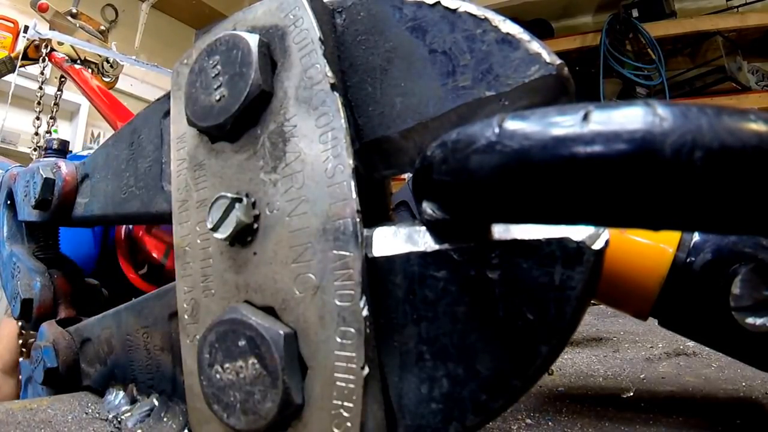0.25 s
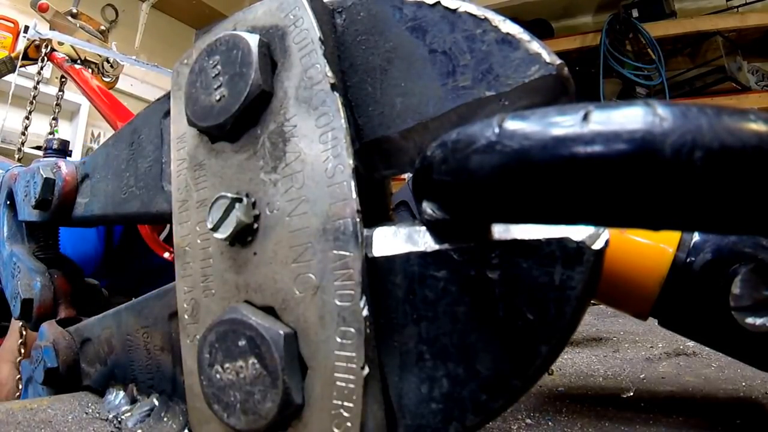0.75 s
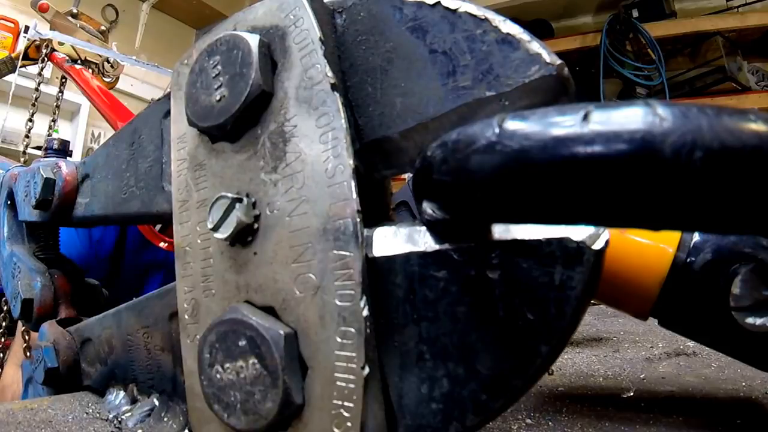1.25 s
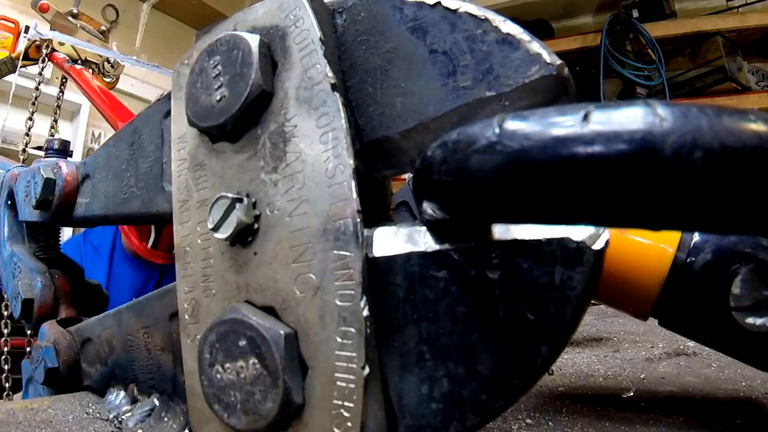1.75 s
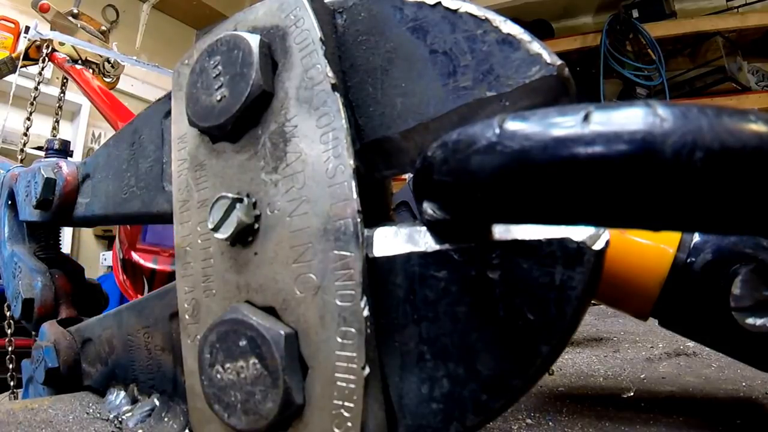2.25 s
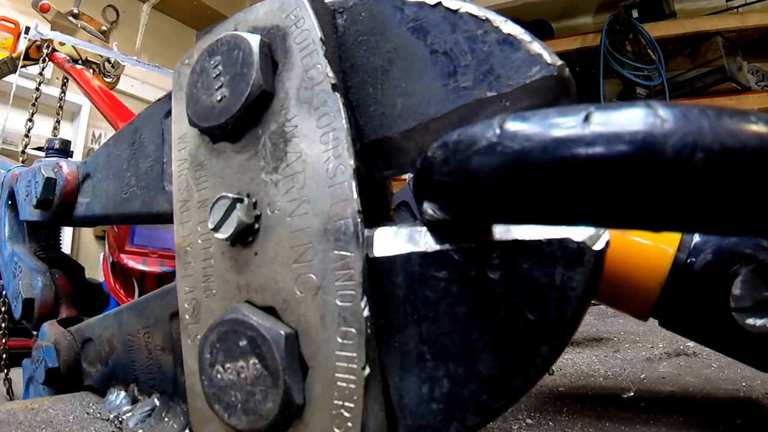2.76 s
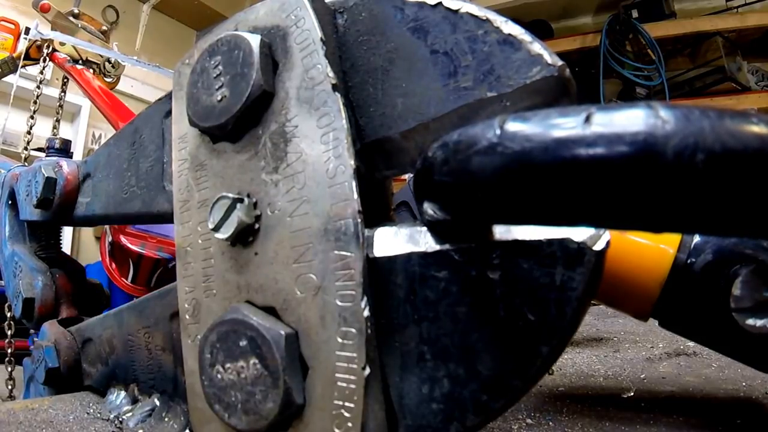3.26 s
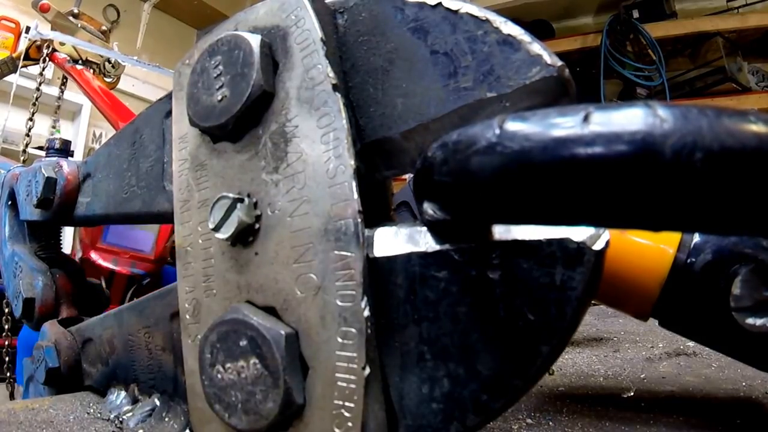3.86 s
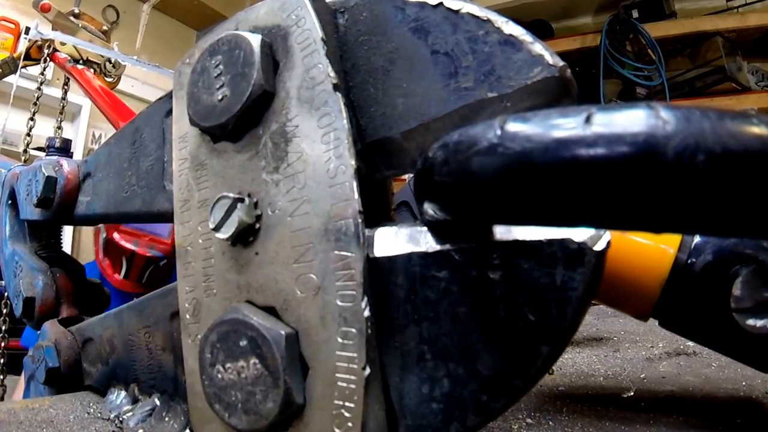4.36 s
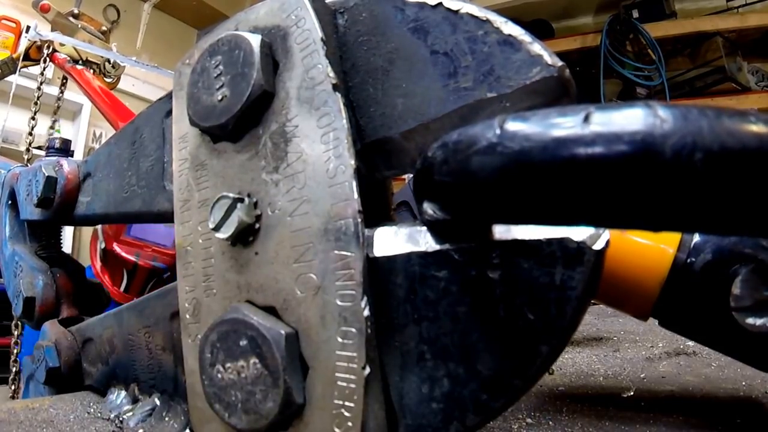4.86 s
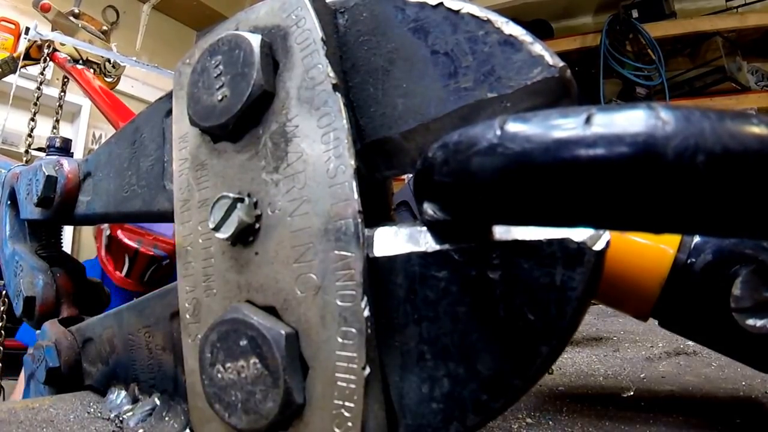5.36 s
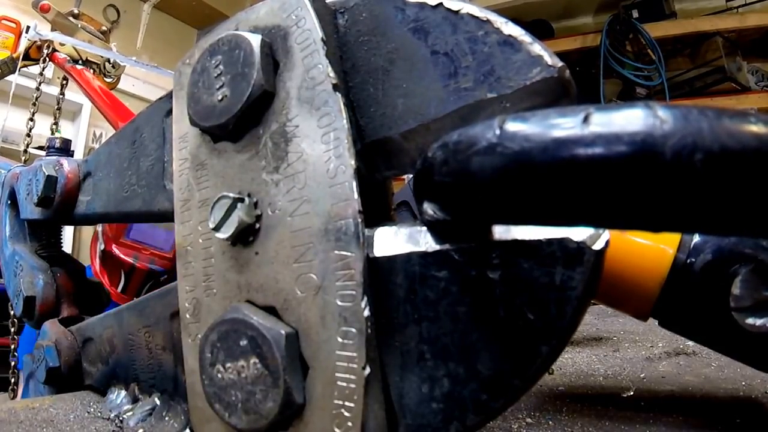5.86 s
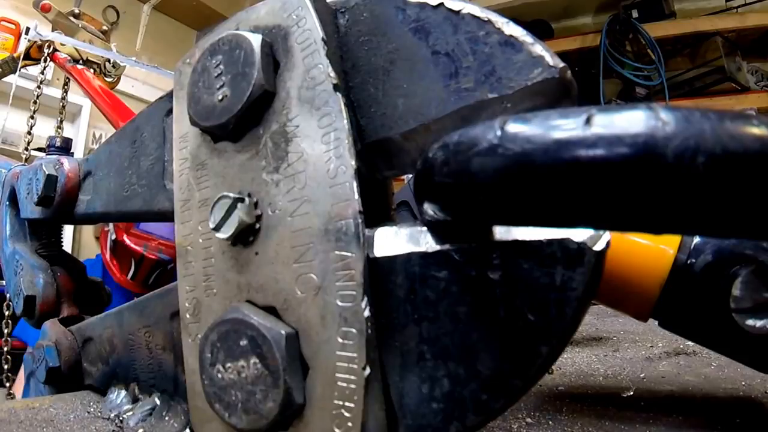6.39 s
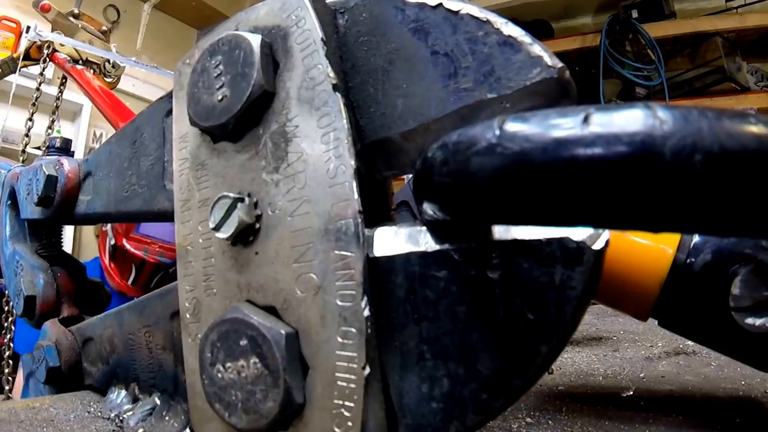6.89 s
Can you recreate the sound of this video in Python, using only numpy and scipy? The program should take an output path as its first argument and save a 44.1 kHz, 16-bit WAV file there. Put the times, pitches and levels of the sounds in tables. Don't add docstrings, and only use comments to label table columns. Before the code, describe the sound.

Quiet workshop with hard walls and short reverberation, heard from a small camera attached to the rig. From 0 to 2.2 s slack chain clinks and slides in hand, lightly and irregularly, with rasping pulls around 1 and 1.4 s and a brighter knock at 1.8 s. At 2.4-2.55 s hollow mount knocks bunch up with the first pawl snap, the level dipping for an instant; small clinks follow and it nearly settles by 3 s. A low growl of loaded chain leads to a hard click at 3.35 s. Cranking then continues unevenly to about 7 s, with bright snaps near 4, 4.4, 5, 5.4, 6 and 6.45 s. Heavier lever slams with dull floor thuds land at 3.65, 4.1, 4.74, 5.72 and 6.84 s. Between them are clanks, ticks, short beating rings, high sizzle and shivering taut chain, over boomy shaking and faint room tone.

```python
import sys
import numpy as np
from scipy import signal
from scipy.fft import rfft, irfft, next_fast_len
from scipy.io import wavfile
from scipy.ndimage import uniform_filter1d, minimum_filter1d, map_coordinates

SR = 44100
rng = np.random.default_rng(int(sys.argv[2]) if len(sys.argv) > 2 else 0)


def put_to_file(sound):
    columns = np.atleast_2d(sound).T
    safe = np.clip(columns, -1, 1)
    whole_steps = np.round(safe * 32767)
    wavfile.write(sys.argv[1], SR, whole_steps.astype(np.int16))


def how_loud(loudness_db):
    steps = np.asarray(loudness_db, float) / 20
    return 10 ** steps


N = 314433

# centre [Hz], width [Hz], level over the clatter [dB].
STEEL_MODES = [(850, 6.5, 13.5), (1167, 11, 2), (1287, 20, 8.5), (1510, 49, 7), (2180, 30, 8.5),
               (2600, 32, 8), (2930, 93, 10), (3400, 91, 7.5), (4535, 49, 8), (4850, 290, 5), (5670, 95, 9),
               (7400, 64, 7.5), (10700, 150, -3)]


def unit(x):
    return x / np.sqrt(np.mean(x ** 2) + 1e-20)


def along(points, hz):
    f, v = np.transpose(points)
    return np.interp(np.log(hz + 1), np.log(f + 1), v)


def wobble(rate):
    knots = rng.standard_normal(int(N * rate / SR) + 4)
    return map_coordinates(knots, [np.arange(N) * rate / SR])


def filtered(x, response):
    size = x.shape[-1]
    m = next_fast_len(size + min(8192, size // 16), True)
    return irfft(rfft(x, m) * response(np.fft.rfftfreq(m, 1 / SR)), m)[..., :size]


def noise(spectrum, size=N):
    return unit(filtered(rng.standard_normal(size), lambda hz: how_loud(along(spectrum, hz))))


def peaks(modes, hz):
    return np.sqrt(1 + sum(how_loud(db) ** 2 / (1 + (2 * (hz - c) / w) ** 2) for c, w, db in modes))


def swells(rows, rise, rest_db):
    linger, sudden = 1, 1.62
    t = np.arange(0, N + 128, 64) / SR
    s, length, db = np.transpose(rows)[:, :, None]
    away = np.abs(t - s) / np.maximum(length, .02) / np.where(t > s, 1, rise)
    fall_db = 20 * away ** np.where(t > s, linger, sudden)
    power = np.sum(how_loud(db - fall_db) ** 2, axis=0) + how_loud(rest_db) ** 2
    return np.interp(np.arange(N) / SR, t, np.sqrt(power))


def add(track, s, sound):
    part = track[max(round(s * SR), 0):][:len(sound)]
    part += sound[:len(part)]


def contacts():
    # start [s], peak [dB], weight [dB], clatter t60 [s].
    slack_knocks = [(0.2105, -31.5, -14.5, 0.21), (0.3491, -35.5, -8, 0.099), (0.5035, -31.5, -6, 0.17),
                    (0.6868, -33.5, -5, 0.19), (0.8245, -34, -6.5, 0.052), (1.1523, -32.5, 2, 0.24),
                    (1.3489, -45, -41, 0.28), (1.6295, -64, -25, 0.08), (1.8043, -26.5, -8, 0.047),
                    (2.2588, -36, -8, 0.13), (2.4054, -48, 2, 0.086), (2.672, -33, -1, 0.11),
                    (2.6838, -35.5, 3.5, 0.092), (2.974, -43.5, 22, 0.044)]
    # start [s], peak [dB], clatter t60 [s].
    pawl_snaps = [(2.5185, -27.5, 0.086), (2.5274, -17.5, 0.075), (3.3276, -19.5, 0.062),
                  (3.35, -11, 0.046), (3.9759, -13, 0.06), (4.4079, -16.5, 0.11), (4.4261, -12.5, 0.048),
                  (4.5592, -17.5, 0.041), (4.7345, -19.5, 0.056), (4.9816, -15, 0.097),
                  (5.4049, -18, 0.065), (5.4194, -15.5, 0.084), (5.4402, -14, 0.05), (5.6994, -24.5, 0.091),
                  (5.9709, -14.5, 0.061), (6.4459, -17, 0.067), (6.4758, -14, 0.074), (6.8385, -19, 0.034)]
    # start [s], peak [dB], clatter t60 [s].
    clanks = [(3.652, -20, 0.045), (3.8541, -45, 0.2), (3.902, -37.5, 0.12), (4.0144, -26, 0.1),
              (4.1004, -24.5, 0.043), (4.2862, -33.5, 0.12), (4.348, -26.5, 0.32), (4.3944, -29.5, 0.15),
              (4.4919, -25, 0.091), (4.6458, -34.5, 0.17), (4.9561, -34, .24), (5.1094, -30.5, 0.067),
              (5.2674, -37, 0.017), (5.338, -26, 0.17), (5.7231, -18, 0.059), (6.0871, -31.5, 0.049),
              (6.2696, -47, 0.49), (6.7505, -34.5, 0.06)]
    # start [s], peak [dB], clatter t60 [s].
    ticks = [(3.3148, -35, 0.071), (3.9424, -34, 0.49), (4.3085, -49, 0.046), (4.971, -36, .06),
             (5.757, -38, 0.036), (5.77, -32, 0.038), (5.787, -53, .05), (5.915, -44.5, 0.41),
             (6.42, -37, .05), (3.478, -31, 0.03), (3.569, -31, 0.074), (3.5943, -27.5, 0.14),
             (3.6144, -29.5, 0.22), (4.0594, -33.5, 0.21), (4.6726, -27.5, 0.19), (4.6944, -28, 0.062),
             (5.6451, -28, 0.18), (5.684, -27.5, 0.11), (6.4298, -29.5, 0.16), (6.6656, -38, 0.077),
             (6.768, -30, 0.26), (6.8109, -25, 0.48)]
    # start [s], peak [dB], clatter t60 [s].
    flicks = [
        (4.137, -38, 0.017),
        (4.1694, -43, 0.035),
        (4.791, -31, 0.037),
        (5.1841, -40.5, 0.061),
        (6.167, -45.5, 0.06),
        (6.2332, -41, 0.025),
        (6.9815, -44, 0.019),
    ]
    kinds = (pawl_snaps, -7), (clanks, 2.5), (ticks, -6), (flicks, -32)
    return slack_knocks + [(s, db, weight_db, t60) for rows, weight_db in kinds for s, db, t60 in rows]


def pawl():
    # frequency [Hz], density [dB per Hz].
    clatter = [(290, -15), (500, -10.5), (710, -7), (2980, -8.5), (4170, -9), (6540, -11), (7320, -14.5),
               (11000, -26), (14400, -70)]
    crowd_db, crowd_spread_db, crowd_step_hz = -7, 9, 34
    out, t = np.zeros(N), np.arange(SR // 4) / SR
    comb, own = np.arange(500), rng.standard_normal(500)
    for s, db, weight_db, t60 in contacts():
        chain = .6 * own + .8 * rng.standard_normal(500)
        tilt = [(900, np.clip(weight_db + 8.5, -20, 16)), (2000, 0), (7000, -.5 * (weight_db + 14.5))]
        spread = [.015, 4] * rng.standard_normal((len(STEEL_MODES), 2))
        modes = [(c * (1 + a), 1.16 * w, level + b) for (c, w, level), (a, b) in zip(STEEL_MODES, spread)]

        def smooth(hz):
            return how_loud(along(clatter, hz) + along(tilt, hz))

        def ringing(hz):
            crowd = how_loud(crowd_db + crowd_spread_db * np.interp(hz / crowd_step_hz, comb, chain))
            return smooth(hz) * (peaks(modes, hz) - 1 + crowd)

        bounce_db = 3.5 * np.interp(t * 300, np.arange(80), rng.standard_normal(80))
        bounces = how_loud((1 - np.exp(-t / .006)) * bounce_db)
        rattle = bounces * how_loud(-60 * t / np.clip(t60, .01, .4)) * (1 - np.exp(-t / .002))
        crash = filtered(rng.standard_normal(len(t)), smooth) * rattle
        hum = filtered(rng.standard_normal(len(t)), ringing)
        linger = how_loud(-60 * t / np.clip(1.37 * t60, .02, .3)) * (1 - np.exp(-t / 0.007))
        both = crash + 0.96 * hum * linger * np.sqrt(bounces)
        add(out, s, how_loud(db + 1) * both / np.abs(both[:SR // 50]).max())
    return out


def pings():
    # start [s], frequency [Hz], peak [dB], t60 [s].
    beating = [(2.259, 5200, -39, 0.057), (2.528, 4820, -26, .04), (2.534, 6520, -29, 0.052),
               (2.532, 1610, -29, 0.086), (2.685, 3450, -48, .06), (2.975, 3600, -55, 0.053),
               (3.352, 2570, -25, 0.036), (3.352, 3960, -30, .035), (3.572, 6600, -42.5, 0.042),
               (3.974, 4770, -14.5, 0.047), (3.974, 6550, -27.5, 0.044), (3.985, 3390, -32, 0.11),
               (4.136, 6480, -40, 0.031), (4.352, 2310, -37, .07), (4.363, 3380, -40, .08),
               (4.409, 4860, -21, .04), (4.428, 3500, -22, 0.078), (4.428, 6500, -24, 0.043),
               (4.561, 3700, -27, 0.062), (4.561, 4880, -23, 0.044), (4.562, 2550, -27, 0.062),
               (4.648, 960, -32.5, 0.067), (4.682, 2780, -41, .05), (4.983, 4750, -20.5, 0.062),
               (4.984, 6280, -31, 0.067), (4.988, 2570, -23.5, 0.088), (5.405, 6660, -32, .09),
               (5.42, 2930, -37, 0.074), (5.446, 3360, -34, .05), (5.447, 4530, -28, .05),
               (5.686, 6610, -45, 0.13), (5.698, 1527, -21, 0.039), (5.7, 3380, -35, 0.074),
               (5.7, 6600, -35, .06), (6.844, 6550, -42, 0.035), (5.722, 4850, -28, .04),
               (5.972, 6450, -23.5, 0.044), (5.972, 4750, -24, 0.064), (6.446, 2956, -20.5, 0.059),
               (6.447, 4980, -25.5, 0.037), (6.45, 2190, -22, .04), (6.452, 6700, -34, .05),
               (6.478, 1300, -21.5, 0.046), (6.478, 2935, -31, 0.078), (6.755, 6550, -44, 0.037),
               (6.757, 4550, -43, 0.047), (6.769, 5200, -22, 0.045), (6.781, 5150, -21, 0.033),
               (6.772, 3390, -38, 0.12), (6.77, 7400, -30, 0.043), (6.812, 6650, -37.5, 0.17),
               (6.81, 3930, -31, 0.053), (6.84, 3160, -27, 0.04)]
    # start [s], frequency [Hz], peak [dB], t60 [s].
    sizzle = [(2.0, 2600, -64, 2.6), (2.01, 2735, -63, 2.6), (6.33, 2600, -50, 0.37),
              (2.535, 11000, -51, 0.23), (3.33, 13000, -58, .04), (3.35, 10700, -33, 0.15),
              (3.352, 8700, -40, .08), (3.4, 10700, -62, 0.28), (3.6, 10700, -53, 0.18),
              (4.018, 9850, -33, 0.045), (4.055, 10430, -55, 0.13), (4.058, 9200, -44, 0.054),
              (4.04, 12300, -58, .1), (4.56, 12600, -54, .05), (4.41, 13300, -58, .06),
              (4.43, 10750, -27, 0.12), (4.43, 9200, -37, .05), (4.735, 10700, -60, 0.13),
              (4.985, 12900, -51, 0.31), (5.405, 10750, -41, 0.28), (5.405, 13000, -56, .05),
              (5.67, 10600, -57, 0.47), (5.972, 9100, -35.5, 0.073), (5.99, 12800, -47, 0.33),
              (6.446, 10700, -48, .1), (6.458, 13000, -56, .05), (6.478, 10600, -37, 0.11),
              (6.478, 9500, -51, 0.092), (6.77, 13200, -56, .04), (6.772, 10800, -41, 0.083),
              (6.8, 10600, -59, .5)]
    out, t = np.zeros(N), np.arange(SR // 4) / SR
    for rows, clean, cycles in (beating, .7, 14), (sizzle, 0.39, 24):
        for s, hz, db, t60 in rows:
            knots = rng.standard_normal((2, 400))
            a, b = (np.interp(t * hz / cycles, np.arange(400), k) for k in knots)
            ring = (clean + a) * np.sin(2 * np.pi * hz * t) + b * np.cos(2 * np.pi * hz * t)
            add(out, s, how_loud(db - 2 - 60 * t / t60) * (1 - np.exp(-t / 0.00069)) * ring)
    return out


def links():
    # start [s], frequency [Hz], peak [dB], t60 [s].
    loose_parts = [(0.70, 473, -38, 0.31), (0.705, 6360, -47.5, 0.28), (0.755, 3560, -48, 0.12),
                   (.22, 2870, -42.5, 0.25), (0.349, 3800, -53, .2), (0.506, 1650, -47, 0.27),
                   (.507, 2300, -52, 0.3), (.69, 2670, -45, 0.25), (1.029, 899, -45, 0.37),
                   (1.63, 3570, -48, 0.11), (1.723, 473, -42, 0.16), (1.861, 498, -45.5, 1.1),
                   (2.398, 660, -26.5, .08), (2.528, 634, -20.5, .05), (2.55, 804, -43.5, 0.59),
                   (2.72, 4120, -75, 1.2), (3.355, 600, -25, 0.087), (3.37, 850, -31, 0.23),
                   (3.652, 513, -15.5, 0.052), (4.736, 600, -20.5, 0.032), (5.74, 1504, -40, 0.25),
                   (6.839, 635, -17, 0.04), (6.856, 804, -26, 0.073), (3.576, 975, -28, 0.044),
                   (4.012, 7400, -39.5, 0.25), (4.012, 10520, -31, 0.1), (4.016, 8800, -39, 0.06),
                   (4.008, 13000, -33, 0.24), (4.346, 884, -21.5, 0.11), (5.48, 4140, -52, 0.49),
                   (6.756, 1020, -35, 0.069)]
    out, t = np.zeros(N), np.arange(SR // 2) / SR
    for s, hz, db, t60 in loose_parts:
        flutter = how_loud(2.5 * np.interp(t * 70, np.arange(40), rng.standard_normal(40)))
        ring = np.sin(2 * np.pi * hz * t + 1.25 * np.log(flutter))
        add(out, s, flutter * how_loud(db - 60 * t / t60) * (1 - np.exp(-t / 0.00037)) * ring)
    return out


def drag():
    # height [s], level [dB], length [s], load [dB].
    slides = [(.05, -38, 0.16, -1), (.3, -46, 0.23, 19.5), (.75, -57, 0.81, 16), (.86, -37, 0.091, -1),
              (.91, -39.5, 0.13, 2), (.97, -33.5, 0.12, -1), (1.08, -60, 0.17, 23), (1.22, -58, 0.33, 22.5),
              (1.4, -34, 0.13, 5), (1.69, -44.5, .15, -15), (1.85, -38.5, 0.23, 4.5),
              (1.96, -45, 0.073, 17), (2.41, -59.5, 0.29, 11), (2.475, -52.5, 0.088, 31),
              (3.12, -54.5, 0.14, 35.5), (3.17, -51.5, 0.11, 37), (3.25, -49.5, 0.18, 38),
              (5.31, -66, 0.23, 37.5), (6.3, -64, 0.096, 42), (6.35, -53.5, 0.11, 31.5),
              (7.13, -54, 0.11, 11)]
    # height [s], level [dB].
    shivers = [(2.578, -47.5), (3.42, -43), (3.7, -56), (4.09, -48), (4.4, -51), (4.6, -46), (4.85, -54.5),
               (5.07, -43.5), (5.52, -47.5), (5.8, -49), (6.05, -45.5), (6.41, -61), (6.58, -52),
               (6.92, -64)]
    # frequency [Hz], density [dB per Hz].
    scrape = [(290, -3), (500, -26.5), (1050, -4.5), (1170, -9.5), (2220, -1), (6500, -8.5), (11000, -27.5),
              (12900, -30), (14000, -80)]
    shiver_s, shiver_load_db = 0.17, 3
    rise, rest_db = 0.59, -74
    moves = slides + [(s, db, shiver_s, shiver_load_db) for s, db in shivers]
    level = swells([(s, length, db) for s, db, length, _ in moves], rise, rest_db)
    load_rows = [(s, length, db + load_db - 18.5) for s, db, length, load_db in moves]
    load = swells(load_rows, rise, rest_db + 10.0)
    grit = how_loud(1.2 * wobble(70) + .7 * wobble(300))
    hiss = unit(filtered(noise(scrape), lambda hz: peaks(STEEL_MODES, hz) ** 0.091))
    growl = noise([(250, -41), (450, 18.5), (850, 7.0), (1500, 1.5), (3000, -8.0), (6000, -19), (10000, -100)])
    return level * grit * hiss + load * grit * growl


def shocks():
    # start [s], peak [dB], pitch [Hz].
    snaps = [(1.021, -30.5, 381), (2.261, -19, 377.6), (2.305, -18.5, 368), (2.4065, -15, 312),
             (2.429, -12, 397), (2.449, -11, 378), (2.524, -10, 390), (2.531, -18, 236.4),
             (2.546, -18.5, 453), (2.415, -18.5, 152), (4.372, -22.5, 408), (6.822, -25, 338),
             (2.674, -25.5, 420), (2.73, -28, 336), (3.265, -15.5, 350), (3.357, -9.5, 312.3),
             (3.674, -15.5, 309), (3.851, -27.5, 388), (3.973, -10.5, 367), (4.429, -10.5, 328.6),
             (4.489, -19.5, 319), (4.557, -24.5, 314), (4.981, -11.5, 358), (5.106, -12.5, 399),
             (5.346, -20.5, 319), (5.417, -16, 346), (5.444, -13, 345), (5.545, -24.5, 348),
             (5.565, -25.5, 336), (4.33, -21.5, 281), (4.455, -20, 298), (5.81, -20, 407),
             (6.101, -16.5, 404.4), (6.235, -35, 323), (6.38, -23, 282), (6.425, -27, 333),
             (6.482, -10, 318), (6.751, -27, 346), (7.03, -34.5, 373), (7.082, -24.5, 373)]
    # start [s], peak [dB], pitch [Hz].
    slams = [
        (3.6545, -7.5, 241),
        (4.098, -13.5, 284),
        (4.738, -7, 253),
        (5.7255, -5.5, 293.4),
        (6.8415, -5.5, 297),
    ]
    # start [s], peak [dB], pitch [Hz].
    shoves = [(0.214, -36.5, 506), (0.255, -27, 173), (0.638, -39, 160), (0.701, -38.5, 170),
              (1.162, -28.5, 482), (1.857, -30, 166), (1.968, -29.5, 203), (2.211, -27.5, 388),
              (2.387, -19, 362.4), (2.403, -11.5, 366.2), (2.902, -39.5, 226), (3.093, -37, 148),
              (3.21, -23, 162.5), (3.409, -16, 342), (3.475, -37, 319), (3.574, -23.5, 309),
              (3.899, -25.5, 364), (4.302, -28, 318), (4.34, -19, 335.5), (4.69, -20.5, 339.6),
              (5.27, -24.5, 347.4), (5.672, -23.5, 327), (5.914, -25.5, 350), (5.968, -16.5, 359),
              (6.272, -28.5, 486), (6.593, -25, 323), (6.791, -36, 334)]
    kinds = (snaps, 0.11), (slams, 0.062), (shoves, 0.39)
    return [(*row, t60) for rows, t60 in kinds for row in rows]


def mount_body(f):
    # centre [Hz], width [Hz], level [dB].
    mount_modes = [(318, 113.6, 5.5), (420, 277, -1.5), (241, 64, -15.5), (910, 15, -63), (600, 700, -13.5)]
    total = 0
    for k, (c, w, db) in enumerate(mount_modes):
        total = total + (-1) ** k * how_loud(db) * 1j * f * w / (c * c - f * f + 1j * f * w)
    return total / (1 + (f / 900) ** 2) / (1 + (200 / (f + 1)) ** 4)


def mount():
    # frequency [Hz], density [dB per Hz].
    crack = [(60, -35), (130, 8), (250, -16), (600, 4.5), (1000, -9), (2000, -23), (7000, -110)]
    out, t = np.zeros(N), np.arange(SR // 4) / SR
    for s, db, hz, t60 in shocks():
        swing = how_loud(-60 * t / np.clip(t60, .02, .24)) * (1 - np.exp(-t / 0.0046)) ** 2
        shudder = unit(filtered(rng.standard_normal(len(t)), mount_body))
        beat = np.sin(2 * np.pi * hz * t) + 0.47 * shudder + 0.067 * np.sin(4 * np.pi * hz * t)
        knock = noise(crack, size=len(t)) * how_loud(-60 * t / 0.037) * (1 - np.exp(-t / 0.0006)) ** 2
        add(out, s - .005, how_loud(db - 3.5) * (beat * swing / swing.max() + 0.19 * knock))
    return out


def strained_rig():
    # height [s], length [s], mount boom [dB], floor rumble [dB].
    heaves = [(0.3, 0.34, -48, -40), (0.676, 0.28, -51.5, -42.5), (1.178, 0.13, -66, -39.5),
              (1.949, 0.31, -56, -32), (2.03, 0.28, -54, -42.5), (2.418, 0.41, -57, -35.5),
              (2.535, 0.14, -32, -31.5), (3.139, 0.19, -31, -28.5), (3.238, 0.16, -27, -25.5),
              (3.384, 0.3, -33.5, -60), (3.685, 0.19, -32, -34), (3.991, 0.2, -28, -31),
              (4.113, 0.076, -27, -28.5), (4.548, 0.98, -38.5, -49.5), (4.814, 0.41, -29.5, -47),
              (5.012, 0.37, -39.5, -31.5), (5.445, 0.22, -28.5, -43), (5.68, 0.16, -55, -43),
              (5.854, 0.53, -29, -35.5), (6.405, 0.35, -34, -38), (6.854, 0.18, -31, -37),
              (7.13, 0.24, -34.5, -42.5)]
    # frequency [Hz], density [dB per Hz].
    floor_rumble = [(40, -36), (70, -19.5), (110, 5), (170, 6.5), (260, 4.5), (400, -23), (600, -19),
                    (1200, -28), (2500, -65)]
    # time [s], level [dB].
    rocking = [
        (0.0, -47),
        (1.81, -77),
        (2.4, -43),
        (2.92, -75),
        (3.63, -44),
        (7.13, -50.5),
    ]
    rise = 0.57
    strain = swells([row[:3] for row in heaves], rise, -71)
    tread = swells([(s, length, db) for s, length, _, db in heaves], rise, -68)
    boom = unit(filtered(how_loud(4.36 * wobble(35)) * rng.standard_normal(N), mount_body))
    rumble = unit(how_loud(3.7 * wobble(25)) * noise(floor_rumble))
    sway = noise([(12, -49), (22, 14), (40, -5.5), (65, 5.5), (90, -59.0), (300, -110)])
    sway_s, sway_db = np.transpose(rocking)
    sway_level = how_loud(np.interp(np.arange(N) / SR, sway_s, sway_db))
    return strain * boom + tread * rumble + sway_level * sway


def stops():
    # start [s], peak [dB].
    thuds = [
        (0.261, -29.5),
        (1.171, -30.5),
        (2.402, -46),
        (3.65, -20.5),
        (4.098, -20),
        (4.739, -18.5),
        (5.724, -20),
        (6.84, -20),
    ]
    # frequency [Hz], density [dB per Hz].
    concrete = [(25, 2.5), (50, -2), (90, 0), (150, -2), (230, 2.5), (400, -48), (1500, -110)]
    out, t = np.zeros(N), np.arange(SR // 3) / SR
    soft = (1 - np.exp(-t / .002)) ** 2
    for s, db in thuds:
        add(out, s, how_loud(db - 5.0 - 60 * t / 0.5) * soft * noise(concrete, size=len(t)))
    return out


def shop(x, turns=24):
    # frequency [Hz], t60 [s].
    decay = [(300, 0.22), (1500, 0.17), (5000, 0.14), (11000, 0.22)]
    out, edges = np.zeros(N), np.linspace(0, N, turns + 1).astype(int)
    for a, b in zip(edges, edges[1:]):
        hz, t, z = signal.stft(rng.standard_normal(SR * 3 // 4), SR, nperseg=256)
        tail = signal.istft(z * how_loud(-60 * t / along(decay, hz)[:, None]), SR, nperseg=256)[1]
        add(out, a / SR + .005, signal.fftconvolve(x[a:b], tail / np.linalg.norm(tail)))
    return out


def hush():
    # frequency [Hz], density [dB per Hz].
    room_tone = [(15, -28), (30, 0.5), (130, -0.5), (200, -4.5), (340, -0.5), (420, -45), (2900, -62),
                 (5500, -38), (9000, -35.5), (12500, -41.5), (15000, -82)]
    return how_loud(-52) * noise(room_tone)


def scene():
    steel = pawl() + links() + pings()
    borne = mount() + strained_rig() + stops()
    return (steel + how_loud(-6.5) * shop(steel) + drag() + borne + hush())[None]


def roll_off(x):
    return signal.sosfilt(signal.butter(12, 14510, fs=SR, output="sos"), x)


def record(dry):
    # frequency [Hz], gain [dB].
    housing = [(9300, -0.5), (9750, -2.5), (10000, -18), (10250, -2), (10700, -2.5), (11300, -2),
               (11800, -5), (13000, 4.5)]
    port = (6530, 300, 9)
    x = filtered(dry, lambda hz: peaks([port], hz) * how_loud(along(housing, hz)))
    duck_start_s, duck_s, duck_db = 2.484, 0.033, -10
    ducked = np.abs(np.arange(N) / SR - duck_start_s - duck_s / 2) < duck_s / 2
    x = x * how_loud(duck_db * uniform_filter1d(1. * ducked, size=180))
    need = np.minimum(1, 0.55 / (np.abs(x) + 1e-9))
    gain = uniform_filter1d(minimum_filter1d(need, size=441, axis=1), size=441, axis=1)
    return roll_off(x * gain)


dry = scene()
out = record(dry)
put_to_file(out)
```